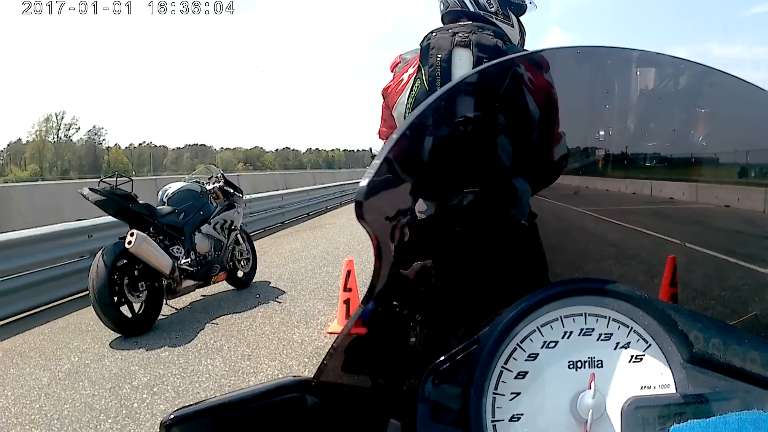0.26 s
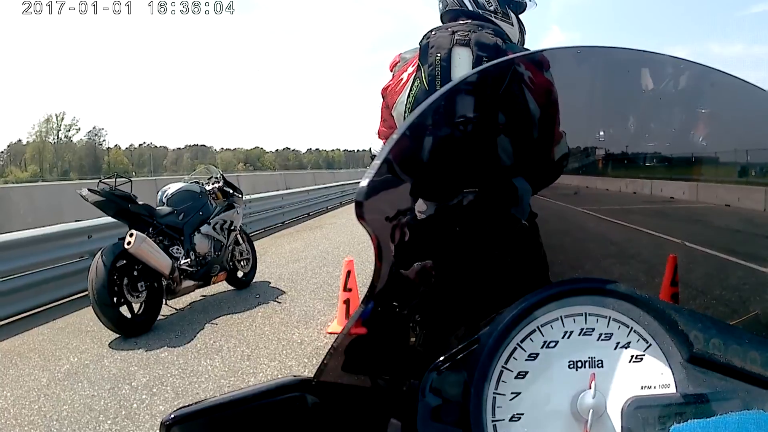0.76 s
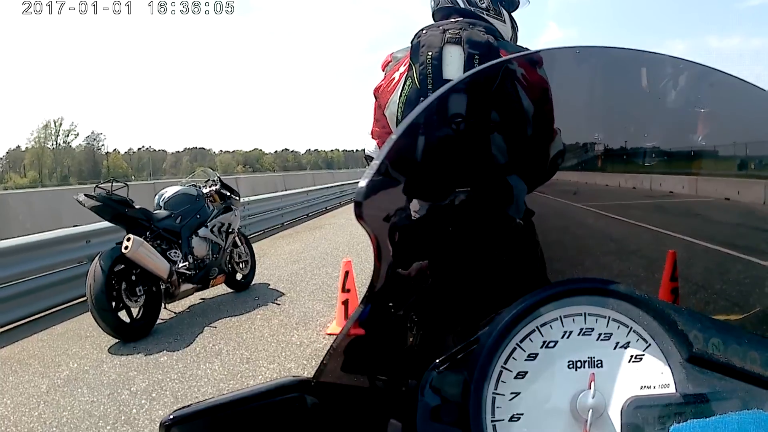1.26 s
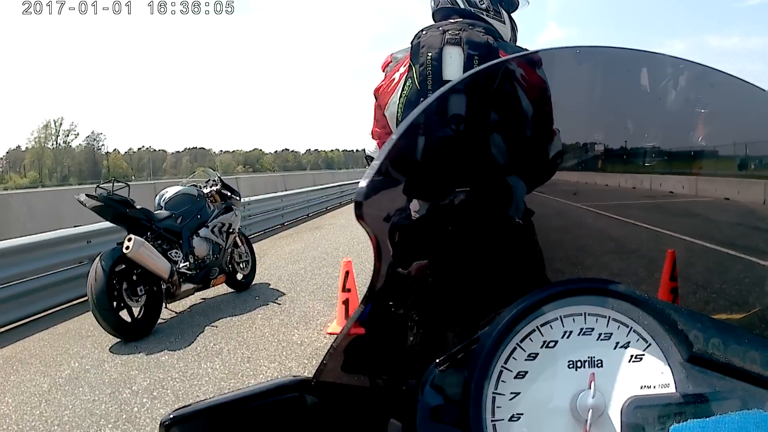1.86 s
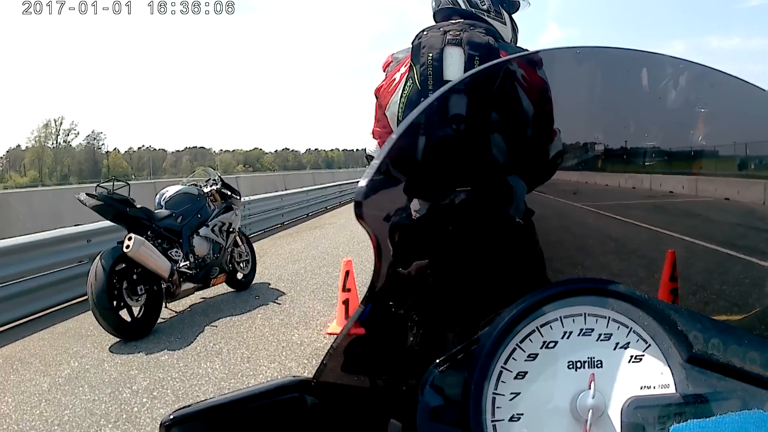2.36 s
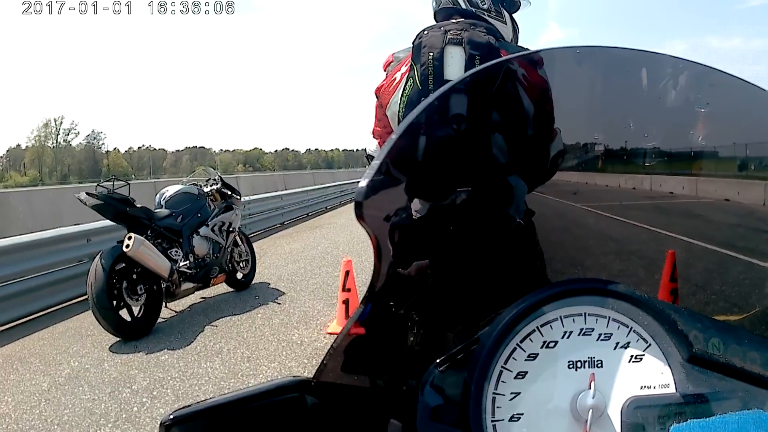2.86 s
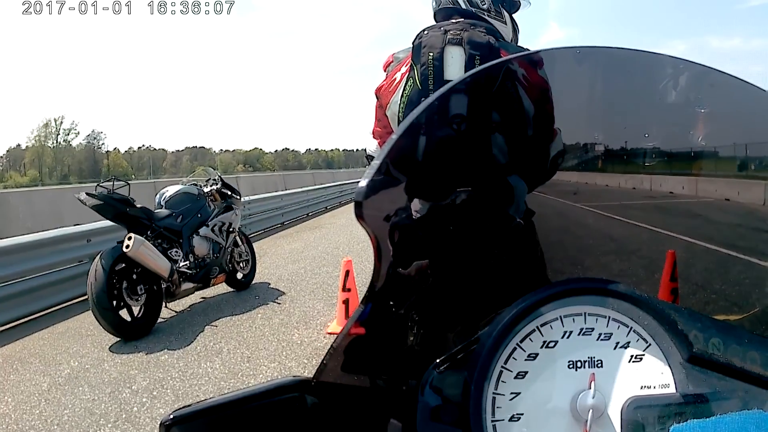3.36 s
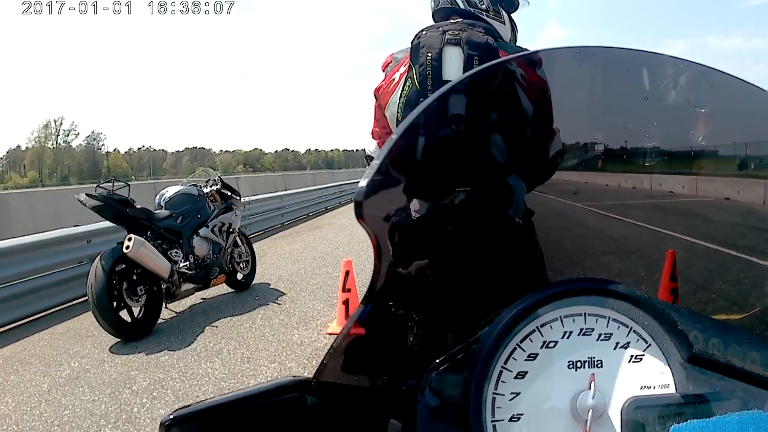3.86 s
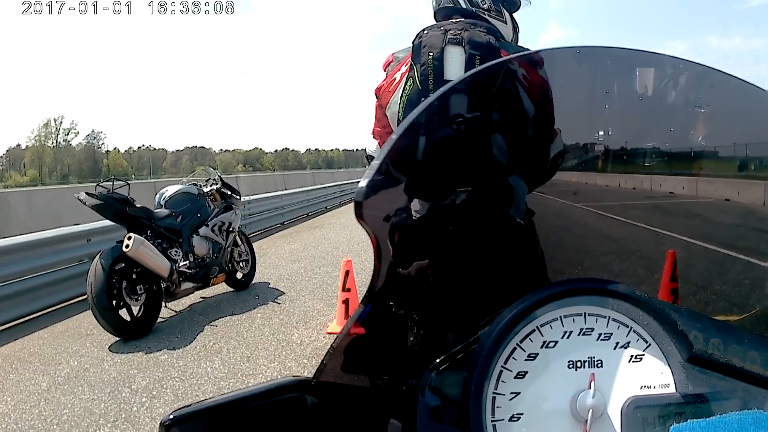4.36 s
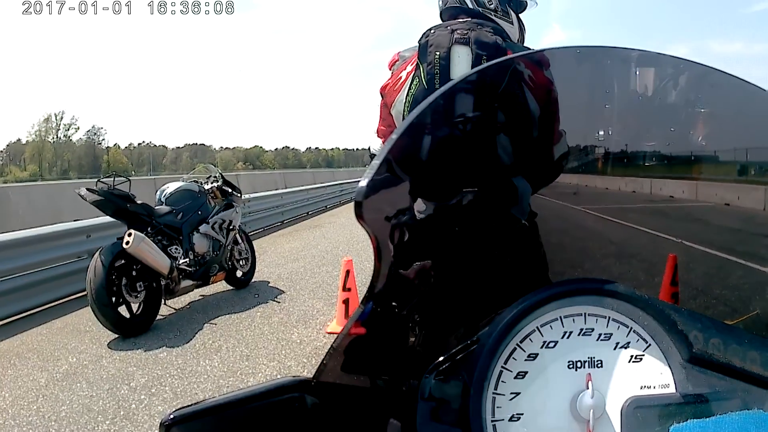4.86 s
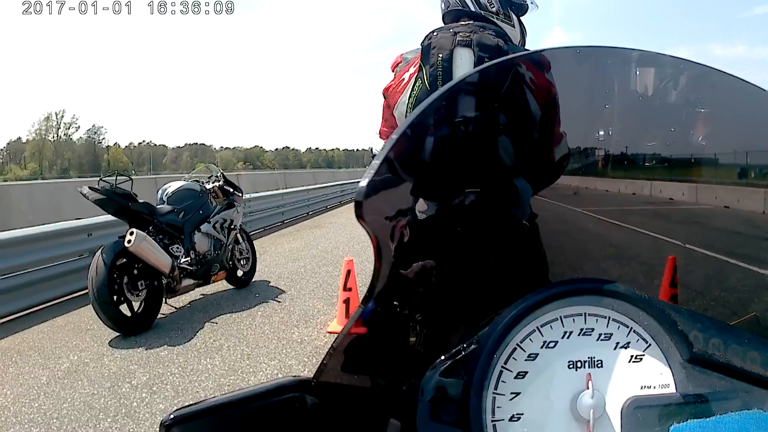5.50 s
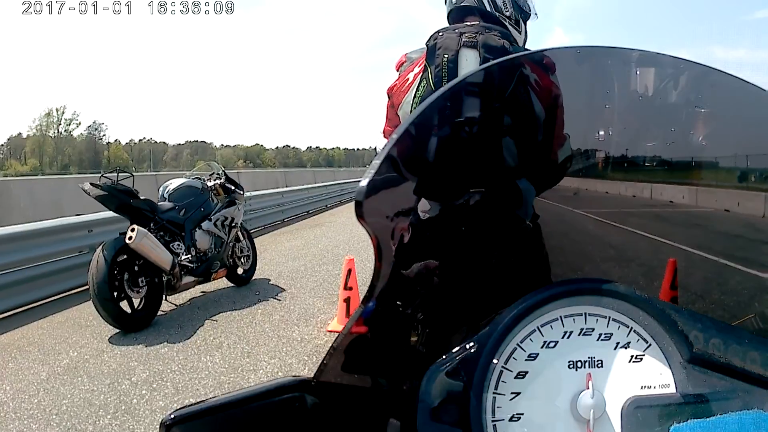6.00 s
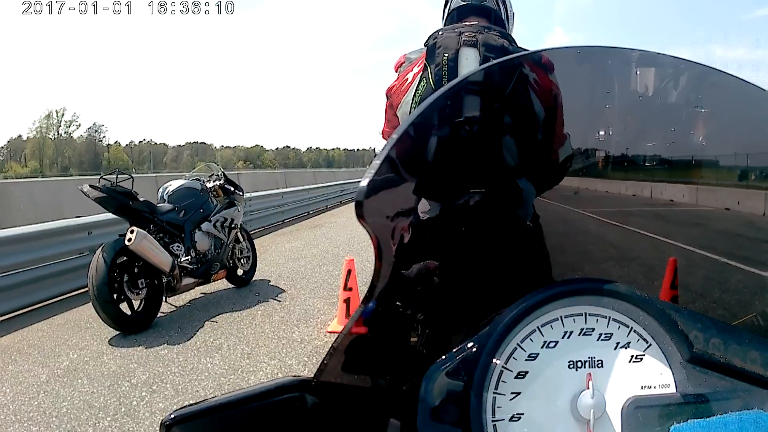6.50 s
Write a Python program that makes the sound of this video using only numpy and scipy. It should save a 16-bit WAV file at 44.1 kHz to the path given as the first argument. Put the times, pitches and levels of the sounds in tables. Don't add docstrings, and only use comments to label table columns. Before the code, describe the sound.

A motorcycle idles in lumpy, uneven thumps, heard through a small camera fixed to it, its case rattling and a panel singing, harshly distorted. At about four seconds the engine shuts off with a jolt. A deep hum rings on and slowly fades, with a brief buzz at first, while another bike idles softly a few metres away outdoors. A faint short squeak comes late.

```python
import sys
import numpy as np
from scipy import signal
from scipy.fft import rfft, irfft
from scipy.io import wavfile
from scipy.ndimage import uniform_filter1d

SR = 44100
rng = np.random.default_rng(int(sys.argv[2]) if len(sys.argv) > 2 else 0)


def amp(db):
    return 10 ** (np.asarray(db, float) / 20)


def inscribe(sig):
    pcm = np.round(np.clip(np.atleast_2d(sig).T, -1, 1) * 32767)
    wavfile.write(sys.argv[1], SR, pcm.astype(np.int16))


N = 297216
TIME = np.arange(N) / SR
RING_HZ, RING_START_S = 43.3, 3.8418


def level(x, db):
    return x * amp(db) / np.sqrt(np.mean(x ** 2))


def curve(rows, off_db):
    s, value = np.transpose(rows)
    return np.interp(TIME, s, value, left=off_db)


def since(start_s):
    return np.clip(TIME - start_s, 0, 1)


def tone(hz):
    return np.sin(2 * np.pi * np.cumsum(hz) / SR)


def resonate(x, modes):
    total = np.zeros(N)
    for k, (hz, width_hz, db) in enumerate(modes):
        b, a = signal.iirpeak(hz, hz / width_hz, fs=SR)
        total = total + (-1) ** k * amp(db) * signal.lfilter(b, a, x)
    return total


def colour(x, points):
    hz, db = np.transpose(points)
    bins_hz = np.arange(N // 2 + 1) * SR / N + 1
    return irfft(rfft(x) * amp(np.interp(np.log(bins_hz), np.log(hz), db)), N)


def walk(rate_hz):
    k = int(SR / rate_hz)
    steps = np.repeat(rng.standard_normal(N // k + 1), k)
    return 1.3 * uniform_filter1d(uniform_filter1d(steps, k), k)[:N]


def firings(turns, degrees, scatter_db, jitter_s):
    at = (np.arange(-1, 160)[:, None] + np.array(degrees) / 720).ravel()
    chance = rng.standard_normal((len(at), 2))
    s = np.interp(at, turns, TIME, left=-1, right=-1) + jitter_s * chance[:, 0]
    inside = (s > 0) & (s < TIME[-1])
    pulses = np.zeros(N)
    pulses[(s[inside] * SR).astype(int)] = amp(scatter_db * chance[inside, 1])
    return pulses


def puff(pulses, decay_s):
    return signal.lfilter([1], [1, -np.exp(-1 / (decay_s * SR))], pulses)


def crank():
    # start_s, cycles_done [720 degree cycles]
    crank_rows = [(0.0, 0.095), (0.6, 7.514), (1.0, 12.501), (1.4, 17.554), (1.8, 22.528), (2.2, 27.566),
                  (4.0, 50.081), (4.2, 52.629)]
    s, done = np.transpose(crank_rows)
    return np.interp(TIME, np.append(s, 7), np.append(done, done[-1] + 30))


def engine():
    firing_angles = [0, 180, 425, 605]
    # centre_hz, width_hz, level_db
    frame_modes = [(42.96, 3.9, 7), (60.46, 16.8, -2), (133.7, 14, -7.5)]
    # centre_hz, width_hz, level_db
    case_modes = [(188.1, 9.7, -7.5), (228.1, 24.6, 1.5), (329, 30.4, -8.5), (446, 63, -4.5),
                  (630.4, 78, -4.5), (873, 76.4, -2.5), (1299, 109, -4.5), (1460, 59, 0),
                  (2077, 198, -13.5), (3070, 920, -19.5)]
    # centre_s, change_db
    lurches = [(0.022, 10.5), (.34, 9), (.44, 7.5), (.49, 6), (.66, 5.5), (.74, 0.5), (.93, -6.5),
               (1.53, 3), (1.698, 7), (1.85, 3.5), (1.9, -8.5), (2.09, 3), (2.2, -8.5), (2.255, 4.5),
               (2.41, 3), (2.58, 1.5), (2.735, 5), (2.95, -7.5), (3.498, -13.5), (3.76, -9.5),
               (3.96, -12.5)]
    # start_s, level_db
    rattle_rows = [
        (0, -7),
        (4.045, -6),
        (4.09, -15.5),
        (4.116, 1.5),
        (4.13, -9.5),
        (4.19, -7.5),
        (4.22, -15.5),
        (4.45, -24),
        (4.49, -36),
    ]
    turns = crank() - 0.08
    pulses = firings(turns, firing_angles, scatter_db=1.5, jitter_s=0.0014)

    thump_db = 1.95 + 1.5 * np.cos(2 * np.pi * (turns - 0.16))
    for s, db in lurches:
        thump_db = thump_db + db * np.exp(-((TIME - s) / 0.029) ** 2)
    thump_db = thump_db - 160 * since(4.1)
    thump = level(resonate(pulses, frame_modes), 0) * amp(thump_db)

    bursts = uniform_filter1d(puff(pulses, decay_s=0.009), 130, origin=64) + 0.41
    swell_db = 2.5 * np.cos(2 * np.pi * (turns - 0.8))
    chatter = bursts * amp(swell_db + 1.95 * walk(29.66)) * rng.standard_normal(N)
    direct = colour(chatter, [(80, -11), (300, -8), (1500, -49.5), (4000, -21)])
    buzz = level(resonate(chatter, case_modes), 0) + level(direct, -4.0)
    fade_db = 60 * np.clip((TIME - 4.46) / 0.12, 0, 1)
    return thump + buzz * amp(1.75 * curve(rattle_rows, -8) + 13.5 - fade_db)


def panel():
    # start_s, change_db
    strikes = [(.12, 8), (.2, 2.5), (.28, -14.5), (.6, 2.5), (.68, -8), (1.0, 7), (1.16, 8.5), (1.32, -11),
               (1.4, -1), (1.56, -4), (1.64, 3.5), (1.72, 6.5), (1.88, 4), (2.28, 1), (2.36, 4.5),
               (2.44, 11), (3.0, -9.5), (3.08, -2), (3.16, 8.5), (3.4, 8.5), (3.64, 0), (3.88, 7),
               (3.96, 3.5), (4.04, -10), (4.12, 5)]
    turns = crank()
    strike_db = 0.83 * rng.standard_normal(90)
    for s, db in strikes:
        strike_db[int(turns[int(s * SR)])] = db
    since_peak = turns - 0.62
    swell_db = 3.5 * np.cos(2 * np.pi * since_peak) * (TIME < 4.2)
    db = -6.5 + swell_db + np.interp(since_peak, np.arange(len(strike_db)), strike_db)
    hz = 315 * (1 + 0.01134 * walk(14))
    return amp(db - 152 * since(4.29)) * tone(hz)


def neighbour():
    # pitch_hz, level_db [dB per Hz]
    neighbour_points = [(44, -34), (75, 3), (183, -5.5), (206, -7.5), (261, -16), (314, -3), (341, -17.5),
                        (411, -24.5), (440, -24.5), (670, -24), (922, -26.5), (1430, -14), (2760, -20.5),
                        (3150, -26), (4200, -61), (5460, -89), (9240, -120)]
    turns = np.cumsum(14.0 * (1 + 0.03 * walk(1.5))) / SR
    pulses = firings(turns, np.arange(4) * 180, scatter_db=0.8, jitter_s=0.00073)
    gas = (puff(pulses, decay_s=0.009) + 0.6) * amp(0.8 * walk(12)) * rng.standard_normal(N)
    dull = signal.lfilter(*signal.butter(2, 300, fs=SR), pulses)
    heard = colour(level(gas, 0) + level(dull, -27.5), neighbour_points)
    heard = heard + resonate(heard, [(1435, 68, 6.5), (316, 12, -7.0)]) \
        - 0.88 * resonate(heard, [(2650, 960, 0.0065)])
    return level(heard, -31.5) * amp(0.27 * walk(2.8))


def breeze():
    swings = colour(rng.standard_normal(N), [(8, -26.5), (18, 2), (60, -1), (90, -36.5)])
    return level(swings, -35) * amp(3 * walk(1.3))


def mount():
    # start_s, level_db
    ring_rows = [
        (3.88, -44),
        (4.05, -1.5),
        (4.12, -12),
        (4.2, -5),
        (4.36, -6.5),
        (5.92, -21.5),
        (6.1, -22.5),
        (6.45, -28),
        (6.6, -40),
    ]
    # start_s, level_db
    sway_rows = [
        (4.2, -23),
        (4.27, -28.5),
        (4.44, -24),
        (4.6, -27.5),
        (5.7, -50),
        (6.08, -61),
        (6.22, -41),
        (6.6, -39.5),
        (6.74, -22),
    ]
    swing_db = curve(ring_rows, -82) + 4.9
    phase = 2 * np.pi * RING_HZ * (TIME - RING_START_S)
    first = amp(swing_db) * np.sin(phase)
    for order, db in ((2, -23.5), (3, -27.0), (4, -27.5), (5, -22.5), (8, -28.5)):
        overtone_db = 3.9 * swing_db + db + 6.5 * walk(20)
        first = first + amp(overtone_db) * (TIME > 4.2) * np.sin(order * phase)
    sway_db = curve(sway_rows, -86) + 6 + 2.5 * walk(12)
    second = amp(sway_db) * tone(67 * (1 + 0.021 * walk(5)))
    return first + second


def after_buzz():
    knocks = 0.3 + np.sin(2 * np.pi * RING_HZ * (TIME - RING_START_S) - 0.6) ** 2
    db = -18 - 191 * np.clip(4.2 - TIME, 0, 1) - 400 * since(4.45)
    buzz = resonate(knocks * rng.standard_normal(N), [(1423, 62, 14.5), (634, 490, -6.5)])
    return level(buzz, 0) * amp(db)


def squeak():
    # start_s, end_s, low_hz, high_hz
    squeak_row = (5.32, 5.44, 590, 720)
    start_s, end_s, low_hz, high_hz = squeak_row
    along = np.clip((TIME - start_s) / (end_s - start_s), 0, 1)
    strength = amp(-41 + 2 * walk(37.5)) * np.sin(np.pi * along)
    return strength * tone(low_hz + (high_hz - low_hz) * along)


def scene():
    running = engine() + panel() + neighbour() + breeze()
    return (running + mount() + after_buzz() + squeak())[None]


def band_limit(x):
    return signal.sosfilt(signal.butter(12, 15770, fs=SR, output="sos"), x)


def record(dry):
    top, knee = 0.745, 10
    x = dry / (1 + np.abs(dry / top) ** knee) ** (1 / knee)
    excess = uniform_filter1d(np.abs(dry - x), 400)
    hiss = colour(rng.standard_normal(N), [(200, -14), (600, -8), (1500, 5), (4000, -7)])
    x = x + amp(-17.5) * np.tanh(excess) * hiss
    x = signal.sosfilt(signal.cheby1(7, 0.5, 3650, fs=SR, output="sos"), x)
    x = np.clip(x, -0.71, 0.71)
    return band_limit(x)


dry = scene()
out = record(dry)
inscribe(out)
```